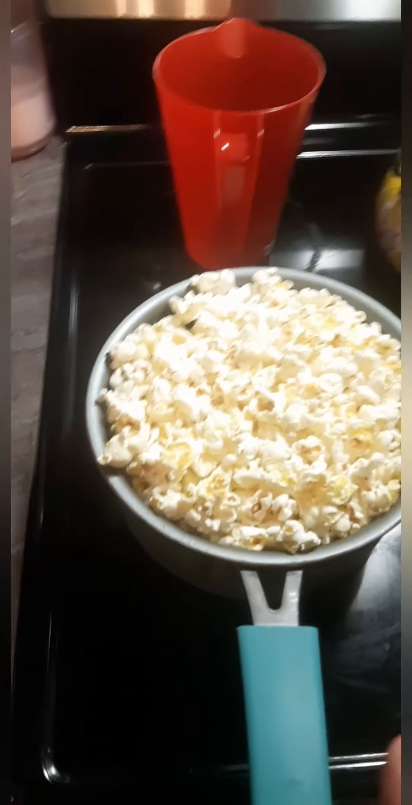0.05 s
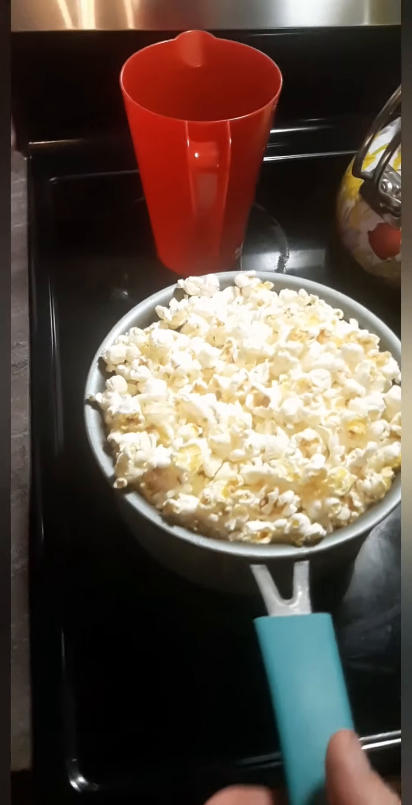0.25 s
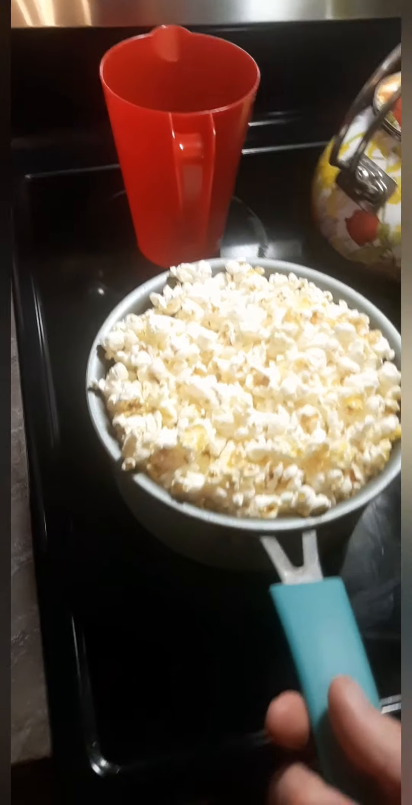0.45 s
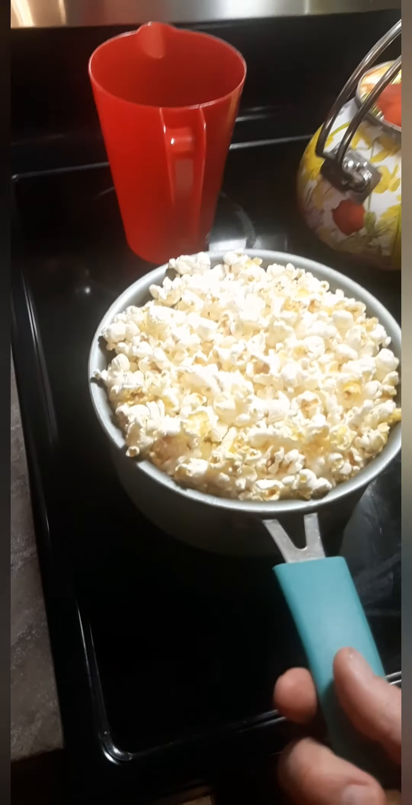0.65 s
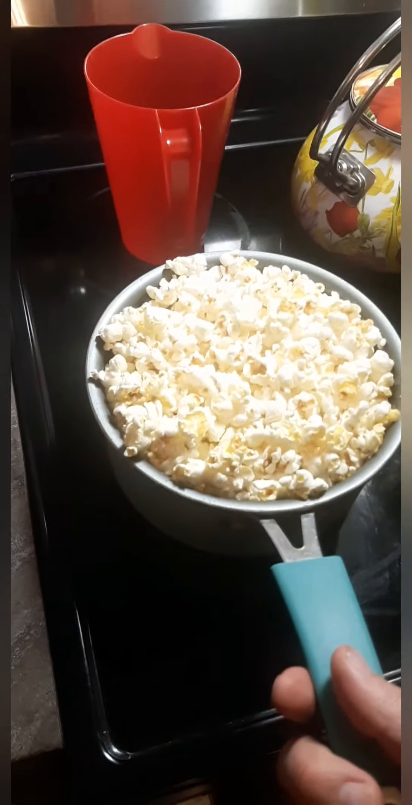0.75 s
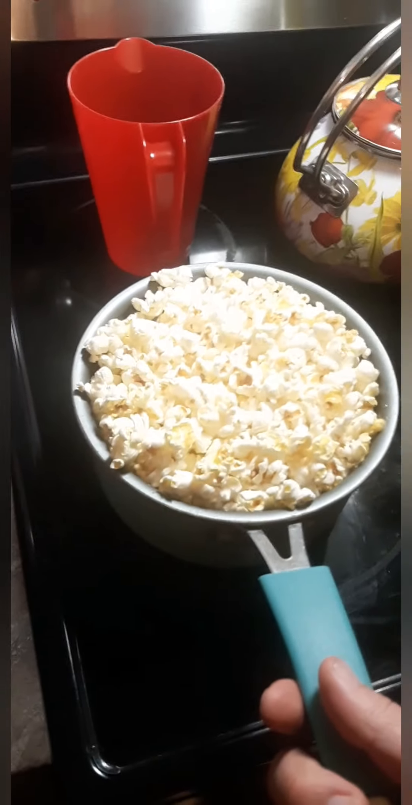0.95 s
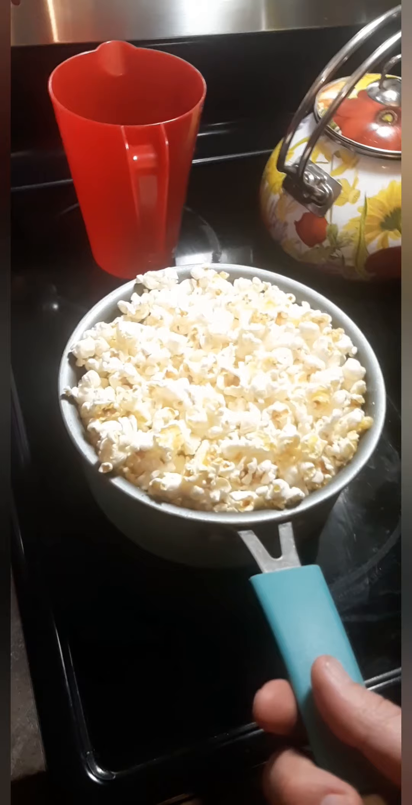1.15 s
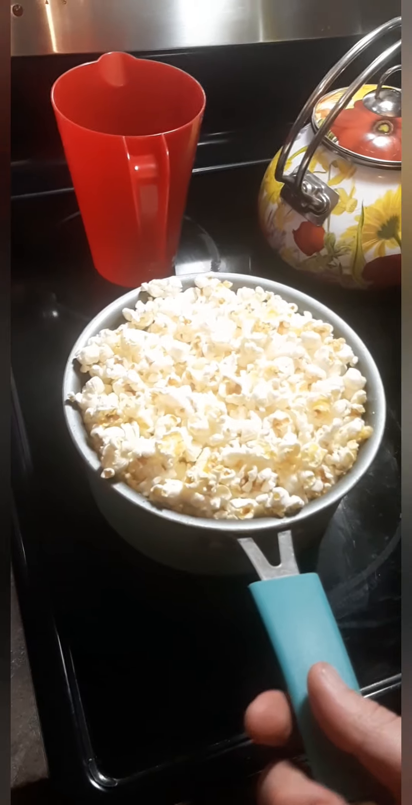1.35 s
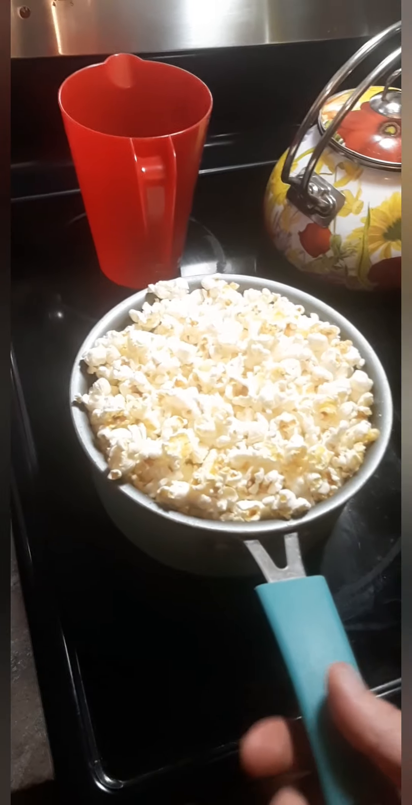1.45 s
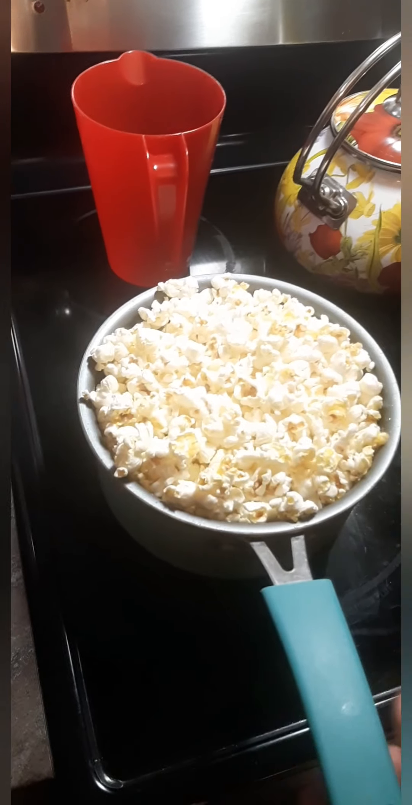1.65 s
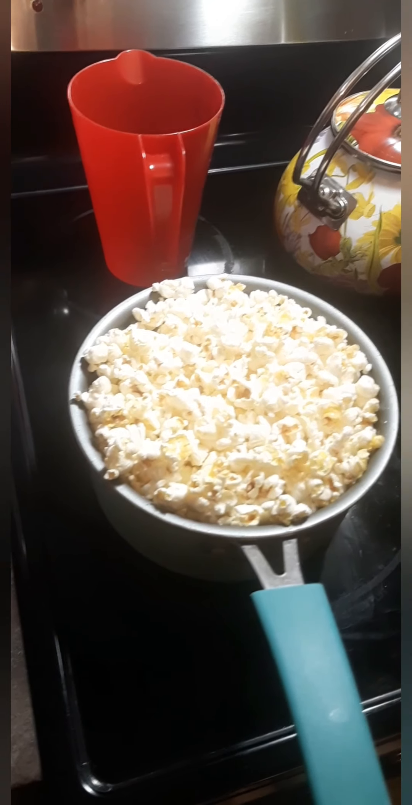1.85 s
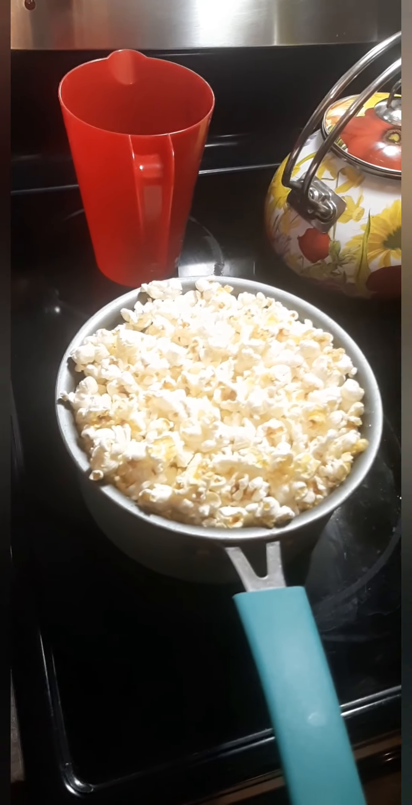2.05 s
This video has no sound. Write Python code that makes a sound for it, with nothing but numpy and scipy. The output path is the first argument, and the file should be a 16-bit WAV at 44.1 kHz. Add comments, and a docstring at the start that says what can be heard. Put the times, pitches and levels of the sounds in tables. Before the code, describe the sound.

A single popcorn pop cracks in a kitchen pot over softly sizzling, ticking oil.

```python
"""A kitchen, with a full pot of popcorn on the stove. One late kernel bursts: a hard crack
that rings the pot and bounces around the room. Flakes land and settle with taps and dull
thuds, and a short jet of steam escapes. Under the heap hot oil keeps spitting and sizzling,
its tiny bubbles coloured by the hollow of the pot. A low room rumble lies below."""
import sys
import numpy as np
from scipy import signal
from scipy.fft import rfft, irfft
from scipy.io import wavfile

SR = 44100
rng = np.random.default_rng(int(sys.argv[2]) if len(sys.argv) > 2 else 0)


def digitize_waveform(pressure):
    """Quantize a signal to 16-bit integers and store it at the path in sys.argv[1].

    Rows of a 2-D input are taken as channels; values are limited to [-1, 1].
    """
    field = np.atleast_2d(pressure).T
    bounded = np.clip(field, -1, 1)
    quanta = np.round(bounded * 32767).astype(np.int16)
    wavfile.write(sys.argv[1], SR, quanta)


N = 92610

# How alike left and right are: freq_hz, likeness (1 and above is mono)
STEREO_LIKENESS = [(30, 0.2), (100, -0.2), (300, 1.3), (600, 0.23), (1000, 0.15), (2300, 0.56),
                   (3500, 0.1254), (16000, 0.13)]


def pop(size=16384):
    """The kernel bursts; the pot rings, near surfaces echo and the room fills."""
    # Hull split, main burst, last snap: start_s, level_db, length_s
    stages = [(0.1513, -17, 0.003), (.1553, 0, 0.00076), (.1569, -10, .0004)]
    # Body and bite of the crack: freq_hz, gain_db
    crack_eq = [(30, -19), (70, -3), (115, 5), (170, 5), (215, 4.5), (290, 15), (400, 7), (500, 11.5),
                (620, 14), (760, 6), (880, 9), (1100, 1), (1350, 11.5), (1650, 3.5), (2300, 12),
                (2700, 9.5), (3100, 17.5), (3800, 10.5), (4500, 13.5), (6700, 15), (8000, 7.5),
                (11500, 2.5), (16000, -4.5)]
    crack = colour(clicks(stages, size), crack_eq)
    burst_s = stages[1][0]
    mix = np.zeros((2, N))
    for layer in (crack, early_echoes(crack), room_tail(crack)):
        add(mix, 0, layer)
    add(mix, burst_s, pot_ring())
    return mix


def pot_ring(size=16384):
    """One blow sets the pot's modes ringing, each a sine dying at its own rate."""
    # Modes of the pot: pitch_hz, level_db, t60_s
    modes = [(283.2, -45.5, 0.21), (323.5, -47.5, 0.26), (481, -52.5, 0.18), (559, -48.5, 0.26),
             (634.2, -47, .27), (859, -47, 0.15), (1373, -49.5, 0.39), (2150, -49, 0.073),
             (2300, -31.5, 0.097), (3045, -30.5, 0.12), (3144, -33, 0.12), (3240, -40, .14),
             (4026, -38, 0.2), (5360, -49, 0.12), (5626, -39, .12), (6160, -33.5, .16), (6765, -30.5, 0.13)]
    t = np.arange(size) / SR
    ring = np.zeros((2, size))
    for hz, db, t60 in modes:
        phase_cycles = rng.random((2, 1)) * (1 - curve_at(STEREO_LIKENESS, hz)) / 2
        ring += amp(db - 60 * t / t60) * np.sin(2 * np.pi * (hz * t + phase_cycles))
    return ring


def oil_spits(level_db=-7.5):
    """Hot oil spits in small, sharp ticks."""
    # Single spits: start_s, level_db, length_s
    spits = [(0.064, -21, 0.0025), (0.086, -21, .003), (0.13, -18.5, .0006), (0.144, -19, 0.0019),
             (.2722, -2, .0026), (0.296, -12, 0.0045), (.3346, -21, 0.00036), (0.406, -17.5, 0.0044),
             (0.465, -16.5, 0.0095), (0.533, -12.5, 0.00025), (0.554, -12.5, 0.0013), (0.5955, -19, .0005),
             (0.6373, -14, 0.00046), (.6623, -15.5, 0.0011), (.7279, -8, 0.00022), (.7315, -16, 0.0025),
             (0.7415, -12.5, 0.0065), (0.767, -12, 0.0026), (0.876, -22, .002), (.8848, -18.5, 0.0016),
             (1.1188, -11, 0.0027), (1.186, -13.5, 0.0022), (1.2123, -6, .0025), (1.266, -18.5, 0.00089),
             (1.332, -25, 0.00086), (1.387, -25, .0015), (1.502, -19, .0005), (1.5342, -15, .001),
             (1.5396, -9.5, 0.0022), (1.573, -27, 0.00039), (1.6543, -13, 0.0042), (1.682, -28, .001),
             (1.732, -12, 0.0014), (1.7452, -13, 0.0019), (1.8548, -16.5, 0.0015), (1.8836, -15.5, 0.0011),
             (1.966, -17.5, .003), (2.0156, -18, 0.00057)]
    # Thin, bright tick: freq_hz, gain_db
    spit_eq = [(100, -41), (1000, -20), (1400, -4.5), (1800, -12.5), (3300, 0), (5000, -3.5), (6500, 2),
               (8000, -3), (12000, -3.5), (16000, -5.5)]
    return amp(level_db) * colour(clicks(spits, N), spit_eq)


def settling_flakes(contact_s=0.0021, knock_db=0.5):
    """Flakes tap the pot and set it ringing, some with a dull thud."""
    # Landings: start_s, tap_db, thud_db
    landings = [(.2725, -19.5, -19), (.292, -15, -11), (.425, -21.5, -41), (.742, -19.5, -24),
                (.772, -24, -26), (.832, -23, -38), (.912, -21, -32), (1.122, -25.5, -49), (1.19, -21, -36),
                (1.222, -24.5, -35), (1.385, -19, -32), (1.44, -27, -35), (1.545, -20.5, -33),
                (1.622, -23.5, -35), (1.732, -16, -25), (1.882, -21, -27), (1.905, -27.5, -29)]
    # Hollow knock: freq_hz, gain_db
    knock_eq = [(40, -25), (250, -20.5), (400, -10.5), (480, -1), (540, -6.5), (620, 0.5), (720, -12.5),
                (1000, -22), (1230, -5.5), (1350, 8), (1500, -8.5), (1750, -19.5), (2200, -8),
                (2600, -12.5), (3500, -2), (6000, -11), (16000, -19)]
    # How a soft flake drives the ring: freq_hz, gain_db
    ring_eq = [(100, -14), (330, -11), (480, -1), (630, 0), (900, -13), (1400, 1), (2200, -10.5),
               (4000, -22), (16000, -53)]
    # Bassy thud: freq_hz, gain_db
    thud_eq = [(40, -26), (110, -14), (190, -7.5), (310, -4), (450, -6.5), (1000, -25.5), (16000, -52)]
    taps, thuds = np.zeros((2, 2, N))
    for start_s, tap_db, thud_db in landings:
        contact = click(contact_s)
        add(taps, start_s, amp(tap_db) * contact)
        add(thuds, start_s, amp(thud_db) * contact)
    knock = amp(knock_db) * colour(taps, knock_eq)
    ring = convolve(taps, colour(pot_ring(), ring_eq))
    return knock + ring + colour(thuds, thud_eq)


def steam_jet(start_s=0.4806, rise_s=0.0097, stop_s=0.561, sag_db_per_s=-24, release_db_per_s=-330):
    """A kernel vents: a short hiss with a faint whistle in it."""
    # Hiss with a whistling peak: freq_hz, gain_db
    jet_eq = [(200, -77), (1100, -67), (1400, -48), (1750, -61), (2300, -45.5), (3300, -44), (5500, -43),
              (6400, -41), (7000, -32), (7700, -40.5), (11000, -39.5), (14500, -39.5), (16000, -41)]
    t = np.arange(N) / SR
    age = np.maximum(t - start_s, 0)
    attack = np.minimum(age / rise_s, 1)
    decay = amp(sag_db_per_s * age + release_db_per_s * np.maximum(t - stop_s, 0))
    return colour(noise(N) * attack * decay, jet_eq)


def oil_sizzle(bubbles_per_s=1300, spread_db=3, bubble_db=-3.5, fizz_db=-4.5, size_count=6):
    """Tiny bubbles break over a fine fizz and sound the hollow of the pot."""
    # Swells and dips of the sizzle: time_s, level_db
    swells = [(0, 0), (.03, -4.5), (0.071, 0.5), (.115, -1), (.36, -2.5), (.41, 0), (.45, -2.5), (.66, 0),
              (.71, -4.5), (.81, 0), (.92, -2), (.99, -1), (1.03, -0.5), (1.12, -0.5), (1.171, 0),
              (1.38, 1), (1.438, 0.5), (1.468, -3), (1.55, 1), (1.75, 1.5), (1.785, -2), (1.89, 1),
              (1.93, -1.5), (1.97, 0.5), (2.1, -0.5)]
    # Sizzle through the pot's hollow: freq_hz, gain_db
    hollow_eq = [(100, -75), (380, -61.5), (480, -59), (630, -53), (740, -62), (1000, -62.5), (1230, -62.5),
                 (1345, -42), (1470, -48.5), (1730, -61.5), (1900, -63), (2150, -51), (2350, -54.5),
                 (2500, -63), (2950, -50), (3550, -48.5), (4050, -49.5), (4900, -54), (6300, -49),
                 (7500, -53.5), (11000, -53.5), (13000, -56.5), (16000, -60)]
    bubbles = np.zeros((2, N))
    for length_s in np.geomspace(.0002, .0015, num=size_count):
        strengths = amp(spread_db * np.minimum(rng.exponential(1, N), 4.5))
        breaks = rng.random(N) < bubbles_per_s / size_count / SR
        bubbles += convolve(click(length_s), strengths * breaks)
    frying = amp(bubble_db) * bubbles / bubbles.std() + amp(fizz_db) * noise(N)
    envelope = amp(np.interp(np.arange(N) / SR, *np.transpose(swells)))
    return colour(frying * envelope, hollow_eq)


def early_echoes(x, size=4096):
    """Smeared reflections come off the stove back, hood and wall."""
    # Reflections: delay_s, level_db, smear_s
    reflections = [(.0053, -7, 0.0017), (.0072, -20, 0.00088), (0.0112, -22, 0.005), (0.0186, -10, 0.00348),
                   (.023, -18, 0.0033)]
    # Colour of the surfaces: freq_hz, gain_db
    surface_eq = [(100, 4.5), (600, -3), (3000, -1), (6500, -2.5), (9000, 0.5), (16000, -4.5)]
    return convolve(x, colour(clicks(reflections, size), surface_eq))


def room_tail(x, onset_s=0.0057, size=32768):
    """The kitchen's diffuse reverb, each band dying at its own speed."""
    # Reverb times: freq_hz, t60_s
    decay_times = [(60, 0.28), (250, 0.31), (650, .38), (1400, 0.45), (3000, 0.34), (7000, .33),
                   (16000, .3)]
    # Colour of the reverb: freq_hz, gain_db
    room_eq = [(60, -40), (130, -33.5), (260, -38), (450, -28.5), (650, -30), (1000, -36), (1800, -32.5),
               (3100, -36.5), (6200, -42), (9000, -39.5), (16000, -32)]
    hz, t, bands = signal.stft(noise(size), SR, nperseg=256)
    decay = amp(-60 * t / curve_at(decay_times, hz)[:, None])
    tail = signal.istft(bands * decay, SR, nperseg=256)[1]
    tail *= np.minimum(np.arange(tail.shape[1]) / SR / onset_s, 1)
    return convolve(x, colour(tail, room_eq))


def handling_shuffle(fade_db_per_s=-62.5):
    """A soft, low shuffle of handling fades away at the start."""
    # Muffled bump: freq_hz, gain_db
    shuffle_eq = [(30, -57), (110, -40.5), (220, -52), (350, -50), (550, -62.5), (2000, -85)]
    return colour(noise(N), shuffle_eq) * amp(fade_db_per_s * np.arange(N) / SR)


def room_rumble():
    """A steady bed of low room noise."""
    # Bass-heavy room tone: freq_hz, gain_db
    rumble_eq = [(10, -62), (30, -65), (60, -51), (110, -52.5), (160, -58.5), (220, -66.5), (330, -61.5),
                 (500, -71), (1500, -76.5), (16000, -81)]
    return colour(noise(N), rumble_eq)


def click(length_s, scatter_hz=950, size=2048):
    """A flat-spectrum click of unit energy: one clean push in the bass, scattered in the treble."""
    t, hz = np.arange(size) / SR, np.fft.rfftfreq(size, 1 / SR)
    grit = rfft(rng.standard_normal((2, size)) * np.exp(-(t / (2 * length_s)) ** 2))
    push = np.exp(-2j * np.pi * hz * length_s)
    scatter = hz ** 2 / (hz ** 2 + scatter_hz ** 2)
    spectrum = scatter * grit / (abs(grit) + 1e-12) + (1 - scatter) * push
    wave = irfft(spectrum / (abs(spectrum) + 1e-12))[:, :size // 2]
    return wave / np.linalg.norm(wave, axis=1, keepdims=True)


def clicks(events, size):
    """A stereo track with one click for each event."""
    track = np.zeros((2, size))
    for start_s, db, length_s in events:
        add(track, start_s, amp(db) * click(length_s))
    return track


def noise(size):
    """Stereo white noise whose width varies with frequency."""
    common, separate = rfft(rng.standard_normal((2, size)))
    likeness = np.clip(curve_at(STEREO_LIKENESS, np.fft.rfftfreq(size, 1 / SR)), -1, 1)
    right = likeness * common + np.sqrt(1 - likeness ** 2) * separate
    return irfft(np.array([common, right]), size)


def colour(x, eq, size=4096):
    """Minimum-phase EQ through (freq_hz, gain_db) points."""
    log_gain = np.log(amp(curve_at(eq, abs(np.fft.fftfreq(size, 1 / SR)))))
    spectrum = np.exp(np.conj(signal.hilbert(log_gain)))
    return convolve(x, np.fft.ifft(spectrum).real[:size // 2])


def convolve(x, response):
    """Convolution, cut to the length of the scene."""
    return signal.oaconvolve(x, np.atleast_2d(response), axes=1)[:, :N]


def curve_at(points, hz):
    """Reads a curve on a log-frequency axis."""
    freqs, values = np.transpose(points)
    return np.interp(np.log(hz + 1), np.log(freqs), values)


def add(mix, start_s, sound):
    """Mixes a stereo sound in at start_s."""
    part = mix[:, round(start_s * SR):][:, :sound.shape[1]]
    part += sound[:, :part.shape[1]]


def amp(db):
    """Decibels to gain."""
    return 10 ** (np.asarray(db) / 20)


def scene(reverb_send_db=-3.5):
    """The pop over spits, flakes, steam and sizzle, all in the kitchen."""
    spits = oil_spits()
    patter = spits + settling_flakes()
    space = early_echoes(spits) + amp(reverb_send_db) * room_tail(patter)
    return pop() + patter + space + steam_jet() + oil_sizzle() + handling_shuffle() + room_rumble()


def record(dry, ceiling=0.97, cutoff_hz=16000):
    """Each side gets its own colour, the pop clips softly and a low-pass trims the top."""
    # Stereo balance: freq_hz, left_minus_right_db
    balance = [(100, 2.5), (300, -2), (480, -6), (680, -2.5), (1000, 2), (1400, 3.5), (1900, -5),
               (2400, -3.5), (3000, 5), (3800, -5), (5000, -1.5), (6400, -10.5), (8200, 2.5), (10500, -2.5),
               (12300, 1), (14500, -2.5)]
    left = colour(dry[:1], [(hz, db / 2) for hz, db in balance])
    right = colour(dry[1:], [(hz, -db / 2) for hz, db in balance])
    limited = ceiling * np.tanh(np.vstack([left, right]) / ceiling)
    lowpass = signal.firwin(511, cutoff_hz, window=("kaiser", 9), fs=SR)
    return signal.oaconvolve(limited, lowpass[None], "same")


dry = scene()
out = record(dry)
digitize_waveform(out)
```